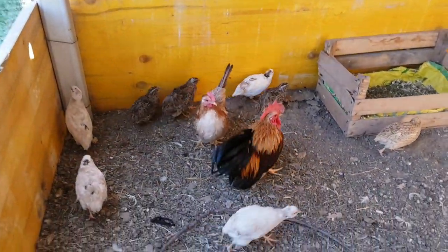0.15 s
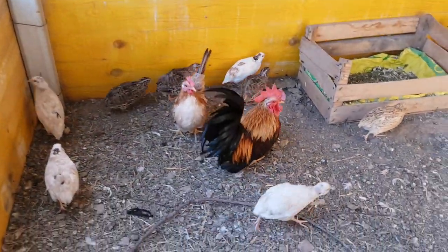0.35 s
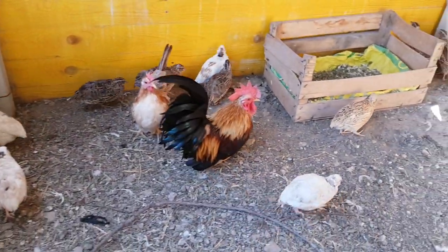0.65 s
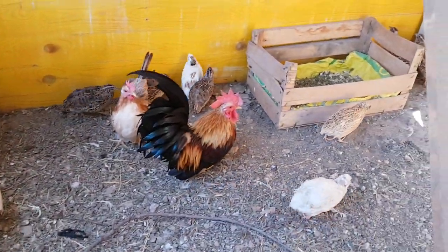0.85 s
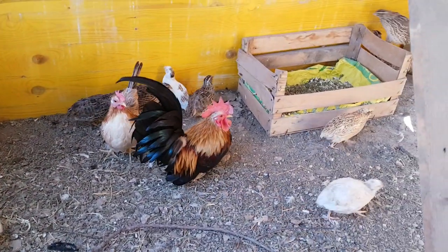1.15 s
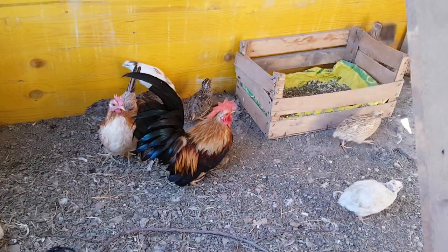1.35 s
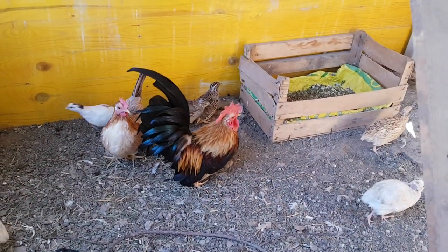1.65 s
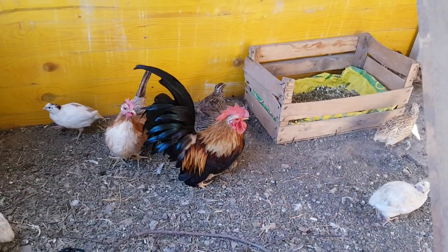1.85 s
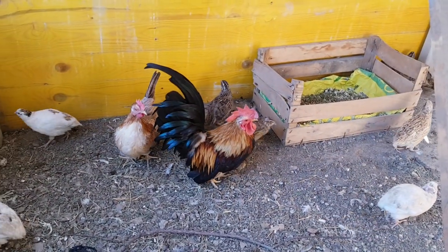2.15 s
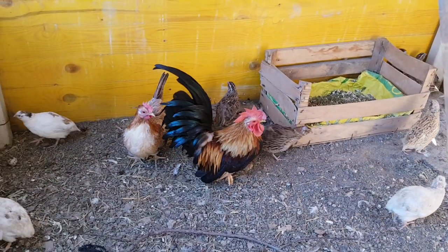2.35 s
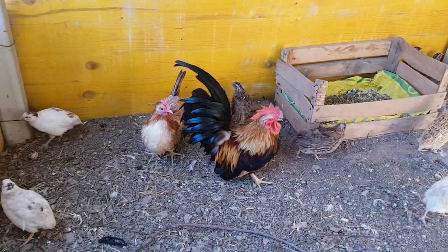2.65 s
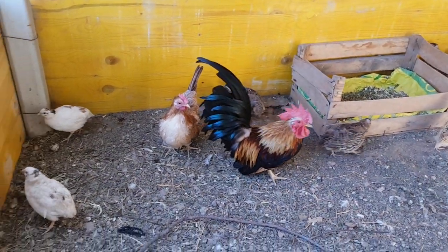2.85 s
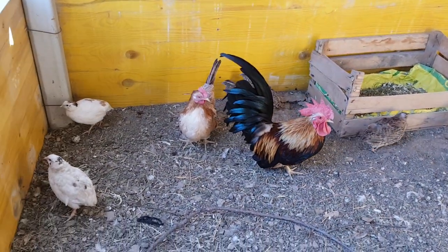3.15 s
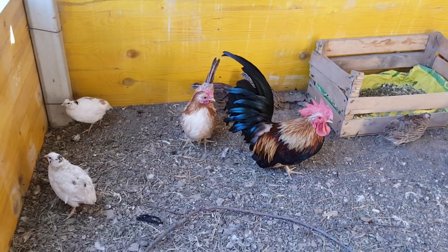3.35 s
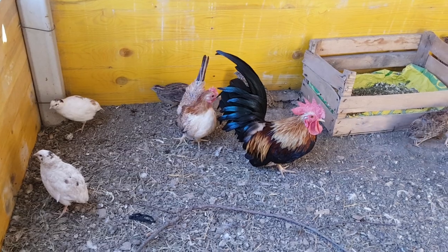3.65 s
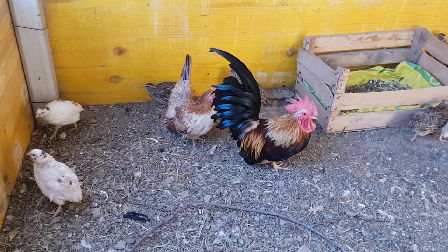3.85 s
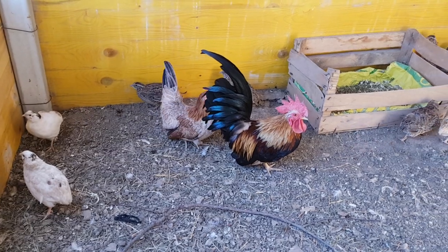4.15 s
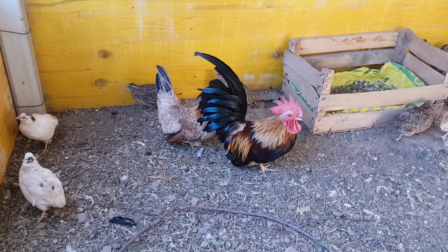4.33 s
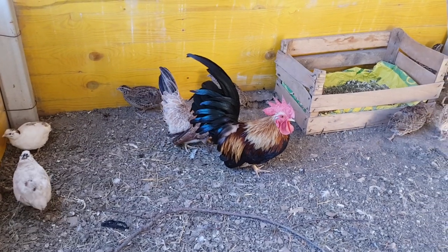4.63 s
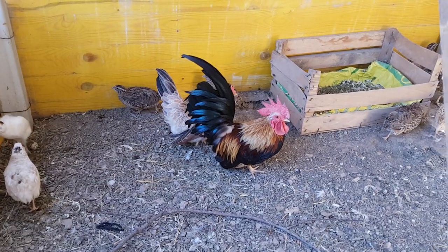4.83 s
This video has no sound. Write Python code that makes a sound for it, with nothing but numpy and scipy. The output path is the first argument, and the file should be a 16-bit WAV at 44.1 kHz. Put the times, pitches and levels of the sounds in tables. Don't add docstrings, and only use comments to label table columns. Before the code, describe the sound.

Quiet boarded bird pen: faint whistles and hum, a flurry of feet scraping grit and knocking wood, then a quail's loud rattling crow.

```python
import sys
import numpy as np
from scipy import signal
from scipy.fft import rfft, irfft, next_fast_len
from scipy.io import wavfile
from scipy.ndimage import uniform_filter1d

SR = 44100
rng = np.random.default_rng(int(sys.argv[2]) if len(sys.argv) > 2 else 0)


def transcribe(u):
    v = np.clip(np.atleast_2d(u).T, -1, 1)
    q = np.round(v * 32767).astype(np.int16)
    wavfile.write(sys.argv[1], SR, q)


def invert_db(x):
    u = np.asarray(x, float) / 20
    return 10 ** u


N = 219838

# frequency in Hz, level in dB per Hz.
GRIT_TONE = [(120, -34), (200, -3.5), (1080, 1), (1740, 3.5), (2420, -3), (7140, -14), (14900, -36.5),
             (16000, -84)]


def evened(x):
    return x / np.sqrt(np.mean(x ** 2) + 1e-20)


def read(points, hz):
    f, value = np.transpose(points)
    return np.interp(np.log(hz + 1), np.log(f + 1), value)


def add(mix, s, sound):
    part = mix[round(s * SR):][:len(sound)]
    part += sound[:len(part)]


def colour(x, gain):
    size = next_fast_len(x.shape[-1] + 512)
    spectrum = rfft(x, size) * gain(np.fft.rfftfreq(size, 1 / SR))
    return irfft(spectrum, size)[..., :x.shape[-1]]


def highpass(x, hz, order=4):
    return colour(x, lambda f: f ** order / (f ** order + float(hz) ** order))


def resonate(x, hz, width):
    turn = np.exp(2j * np.pi * np.cumsum(hz * np.ones(len(x))) / SR)
    r = np.exp(-np.pi * width / SR)
    return 2 * (turn * signal.lfilter([1 - r], [1, -r], x / turn + 1e-18)).real


def ports(x, lag_s, pan_db):
    late = colour(x, lambda f: invert_db(pan_db * f / (f + 400)) * np.exp(-2j * np.pi * f * lag_s))
    return np.array([late, x])


def air():
    # frequency in Hz, level in dB per Hz.
    air_tone = [(15, -47), (25, -14), (256, -14.5), (911, -13), (1740, -15), (6740, -23.5), (8830, -26.5),
                (16000, -31.5)]
    # frequency in Hz, left-right likeness from -1 to 1.
    likeness = [(60, 0.64), (150, 0.87), (380, 0.55), (950, -0.24), (2380, 0.14), (5980, -0.1),
                (15000, 0.029)]
    boom_hz, boom_octaves, boom_db = 422, 0.6, 7
    frames, hz = N // 256 + 5, np.fft.rfftfreq(1024, 1 / SR)
    a, b, c, d, patches = rng.standard_normal((frames, 513, 5)).T
    patches = evened(uniform_filter1d(uniform_filter1d(patches, 12, 0), 10, 1))
    swell = evened(uniform_filter1d(rng.standard_normal(frames), 20))
    same = np.clip(read(likeness, hz), -1, 1)[:, None]
    left = a + 1j * b
    right = same * left + np.sqrt(1 - same ** 2) * (c + 1j * d)
    boom = boom_db * np.exp(-(np.log2(hz / boom_hz + 1e-9) / boom_octaves) ** 4)
    level_db = (read(air_tone, hz) + boom)[:, None] + 1.6 * patches + .7 * swell
    z = np.array([left, right]) * invert_db(level_db)
    wash = evened(signal.istft(z, nperseg=1024, noverlap=768)[1][:, :N])
    return invert_db(-70) * wash * invert_db([[-1.2], [1.2]])


def hum():
    loud_span = (.25, 3.55)
    hum_hz, loud_db, faint_db, fade_s = 1156, -77.5, -90, .15
    t = np.arange(N) / SR
    inside = np.minimum(t - loud_span[0], loud_span[1] - t)
    on = np.clip(inside / fade_s + .5, 0, 1)
    whine = evened(resonate(resonate(rng.standard_normal(N), hum_hz, 38), hum_hz, 39))
    return ports(whine * invert_db(faint_db + (loud_db - faint_db) * on), .00036, -6)


def songbirds():
    # start in seconds, first pitch in Hz, last pitch in Hz, level in dB.
    chirps = [(0.03, 4300, 3560, -79), (0.057, 4300, 2220, -71), (0.2, 3320, 4320, -74.5),
              (0.222, 4330, 4800, -79), (0.266, 2240, 2270, -81.5), (0.322, 2470, 2840, -70),
              (0.348, 1970, 1800, -74), (0.361, 4830, 3620, -75), (0.422, 2500, 3640, -70.5),
              (0.463, 3490, 3140, -70), (0.49, 3600, 2050, -65), (0.526, 2050, 1950, -73),
              (0.762, 2820, 3920, -65.5), (0.786, 4200, 3100, -73), (0.819, 4020, 2240, -70),
              (.853, 1935, 1810, -76.5), (0.917, 3700, 4200, -75), (1.047, 5400, 2190, -67),
              (2.684, 2840, 2990, -74), (2.977, 3450, 2890, -71.5), (3.023, 2005, 1720, -82),
              (3.062, 5100, 2990, -77), (3.095, 2890, 1950, -81), (3.148, 4800, 2780, -76),
              (3.236, 2176, 1990, -78), (3.25, 3900, 2970, -75), (3.285, 2850, 2610, -71),
              (3.297, 2045, 2030, -77.5), (3.4, 2310, 2100, -80)]
    shortest_s, glide_s_per_octave = .026, .009
    out = np.zeros(N)
    for s, start_hz, end_hz, db in chirps:
        length = shortest_s + glide_s_per_octave * abs(np.log2(end_hz / start_hz))
        hz = np.geomspace(start_hz, end_hz, round(length * SR))
        wobble = evened(uniform_filter1d(rng.standard_normal(4000), size=90))
        flutter = invert_db(4.5 * wobble)[:len(hz)]
        whistle = np.sin(2 * np.pi * np.cumsum(hz) / SR)
        add(out, s, invert_db(db + 10) * flutter * whistle * np.hanning(len(hz)) ** .5)
    return out


def scrapes():
    # start in seconds, peak in dB, length in seconds, slope in dB per octave.
    strokes = [(0.771, -52, 0.03, 3), (1.237, -58.5, 0.014, 3), (1.252, -36.5, 0.036, 4.5),
               (1.279, -30, 0.035, 4.5), (1.307, -27.5, 0.018, 4.5), (1.366, -42.5, 0.038, 0.5),
               (1.416, -38.5, 0.013, 2), (1.434, -33, 0.013, 4), (1.4762, -38.5, 0.021, -1),
               (1.515, -47.5, 0.023, 0.5), (1.604, -46, 0.015, 4), (1.658, -46.5, 0.06, -2.5),
               (1.841, -40, 0.028, -3), (1.915, -40.5, 0.027, -1.5), (2.027, -55, 0.009, 3),
               (2.195, -60.5, 0.025, 11), (2.2984, -48, 0.052, 1.5), (2.313, -40, 0.015, 7.5),
               (2.385, -56.5, 0.019, 6.5), (2.9283, -53, 0.012, 7)]
    # start in seconds, peak in dB, slope in dB per octave.
    ticks = [(0.131, -48, -5.5), (0.3244, -46, -0.5), (0.69, -47, 9), (0.915, -36, 4.5), (1.0323, -46, 5),
             (1.1051, -46, 1.5), (1.183, -51.5, 5), (1.207, -47.5, 12), (1.6224, -33.5, 1),
             (2.1545, -53, -14), (3.249, -48, 15), (3.334, -50.5, -0.5), (3.504, -46, -4),
             (3.5659, -47, -2), (3.997, -53.5, 17), (4.031, -51, 4)]
    tick_s = 0.0037
    out, t = np.zeros(N), np.arange(0, .15, 1 / SR)
    for s, db, length, slope_db in strokes + [(s, db, tick_s, slope_db) for s, db, slope_db in ticks]:
        clicks = (rng.random(len(t)) < .03) * np.minimum(rng.exponential(1.2, len(t)), 3)
        grit = rng.standard_normal(len(t)) * (.4 + clicks)
        tilt_db = slope_db + 2
        grit = evened(colour(grit, lambda f: invert_db(read(GRIT_TONE, f) + tilt_db * np.log2(f / 4000 + 0.025))))
        shape = np.minimum(t / (.3 * length), 1) * np.exp(-(t / length) ** 1.8)
        add(out, s - .001, invert_db(db - 7) * grit * shape)
    return out


def knocks():
    # start in seconds, peak in dB, lowest mode in Hz, time to fall 60 dB in seconds.
    blows = [(1.04, -56, 460, 0.022), (1.101, -61.5, 367, 0.12), (1.309, -34, 579, 0.08),
             (1.394, -27.5, 743, 0.034), (1.452, -29.5, 382, 0.019), (1.467, -43, 400, 0.024),
             (1.6, -35, 442, 0.052), (1.613, -45, 185.4, 0.2), (1.606, -57, 47.5, 0.22),
             (1.39, -65.5, 47.2, 0.087), (2.027, -42.5, 483, 0.067), (2.512, -39.5, 485, 0.11),
             (3.502, -52, 1730, 0.02)]
    overtones = [1.004, 1.336, 1.824, 2.34, 2.39, 4.5, 3.9, 1.56, 3.3, 1.8, 5.5]
    hard_slope_db, slope_per_db, rise_cycles = -0.5, 0.17, 0.2
    out, t = np.zeros(N), np.arange(0, .5, 1 / SR)
    for s, db, hz, t60 in blows:
        slope_db = hard_slope_db + slope_per_db * (db + 18.5)
        spread = rng.uniform(0.907, 1.052, len(overtones))
        spread[0] = 1
        ring = np.zeros(len(t))
        for k, m in enumerate(overtones):
            fall_db = slope_db * 0.8 * k - 60 * t * m ** .5 / t60
            ring += invert_db(fall_db) * np.sin(2 * np.pi * hz * m * spread[k] * t)
        rattle = 0.018 * rng.standard_normal(2000) * np.exp(-t[:2000] / (0.26 * t60))
        ring = ring + signal.oaconvolve(ring, rattle)[:len(t)]
        ring = ring * (1 - np.exp(-t * hz / rise_cycles))
        ring = signal.lfilter(*signal.butter(3, .7 * hz, "high", fs=SR), ring)
        add(out, s, invert_db(db) * ring / abs(ring).max())
    return out


def treading():
    # time in seconds, effort in dB.
    effort = [(1.22, -74), (1.316, -54), (1.488, -53), (1.652, -59.5), (1.78, -59.5), (1.866, -49),
              (1.988, -48.5), (2.124, -61), (2.366, -73.5), (2.62, -66)]
    mesh_hz = 2400
    s, effort_db = np.transpose(effort)
    lumps_db = 3.2 * evened(uniform_filter1d(rng.standard_normal(N), 500))

    def noise(db):
        return rng.standard_normal(N) * invert_db(np.interp(np.arange(N) / SR, s, db, -120, -120) + lumps_db)

    tread = noise(effort_db)
    stir = noise(-58.5 + effort_db + 50.5)
    thud = noise(-60.5 + 0.35 * (effort_db + 32.5))
    dull = 2.05 * colour(tread, lambda f: invert_db(read(GRIT_TONE, f) - 3.8 * np.log2(f / 500 + 0.16)))
    wires = resonate(resonate(stir, mesh_hz, 260), mesh_hz, 500)
    mesh = 6.4 * wires + 1.12 * resonate(stir, 2740, 1180)
    rumble = 2.6 * resonate(resonate(thud, 104, 130), 83, 230) + 12.0 * resonate(thud, 180.5, 13)
    return dull + mesh + rumble


def thuds():
    # start in seconds, level in dB, centre in Hz, decay in seconds.
    landings = [(1.367, -47, 770, 0.0059), (1.914, -47.5, 1020, 0.013), (2.2, -57.5, 800, 0.0064),
                (2.31, -59, 1940, 0.014), (2.325, -50.5, 610, 0.028), (1.422, -51, 1760, 0.0099),
                (1.425, -46, 2820, 0.011), (2.392, -66, 690, 0.011), (2.509, -37, 890, 0.013),
                (2.511, -40.5, 1890, 0.0084), (2.675, -68, 473, 0.01), (2.787, -58, 1040, .032),
                (2.79, -58, 1710, 0.0093)]
    width_hz, rise_share = 550, 0.46
    out, t = np.zeros(N), np.arange(0, .2, 1 / SR)
    for s, db, hz, decay in landings:
        body = resonate(resonate(rng.standard_normal(len(t)), hz, width_hz), hz, 1.44 * width_hz)
        rise = rise_share * decay
        shape = np.minimum(t / rise, 1) * np.exp(-np.maximum(t - rise, 0) / decay)
        add(out, s, invert_db(db) * evened(body) * shape)
    return highpass(out, 280)


def mutter():
    # pitch in Hz, level in dB, third harmonic in dB.
    low_note = (204, -49, -55.5)
    pitch_hz, db, third_db = low_note
    start_s, length_s = 1.832, .055
    out = np.zeros(N)
    turn = 2 * np.pi * pitch_hz * np.arange(0, length_s, 1 / SR)
    tone = invert_db(db) * np.sin(turn) + invert_db(third_db) * np.sin(3 * turn)
    add(out, start_s, tone * np.hanning(len(turn)) ** .5)
    return out


def beak(t):
    # start in seconds, resting resonance in Hz, top resonance in Hz,
    # time open in seconds, lift while open in dB.
    note_flicks = [
        (4.15, 1190, 1190, .01, 0),
        (4.22, 1200, 1900, .021, -12),
        (4.255, 1200, 1000, .03, -3),
    ]
    # start in seconds, resting resonance in Hz.
    trill_flicks = [(4.411, 1100), (4.462, 1150), (4.513, 1200), (4.564, 1400), (4.615, 1700),
                    (4.665, 1700), (4.712, 1700), (4.757, 1700), (4.806, 2000), (4.846, 2750),
                    (4.885, 2950)]
    # resting resonance in Hz, level in dB.
    muffling = [(1200, -4), (1700, -1)]
    gape_hz, gape_db, gape_s = 3960, -5.5, .033
    tired_hz, tired_gape_s = 1850, .019
    snap_db, close_db = 6.5, 2.5
    trill = [(s, hz, gape_hz, gape_s if hz < tired_hz else tired_gape_s, gape_db) for s, hz in trill_flicks]
    s, rest_hz, top_hz, held, lift_db = np.transpose(note_flicks + trill)
    next_hz = np.append(rest_hz[1:], rest_hz[-1])
    at = s[:, None] + held[:, None] * [0, .12, .24, .62, .82, 1]
    opening_hz, closing_hz = (rest_hz + top_hz) / 2.2, (next_hz + top_hz) / 2.2
    hz = np.array([rest_hz, opening_hz, top_hz, .93 * top_hz, closing_hz, next_hz])
    wide = top_hz > tired_hz + 500
    shut_db, next_shut_db = wide * read(muffling, np.array([rest_hz, next_hz]))
    opening_db = np.where(wide, snap_db, lift_db / 2)
    closing_db = np.where(wide, close_db, lift_db / 2)
    db = np.array([shut_db, opening_db, lift_db, lift_db, closing_db, next_shut_db])
    return np.interp(t, at.ravel(), hz.T.ravel()), np.interp(t, at.ravel(), db.T.ravel())


def syrinx(effort_db, opened, lift_db):
    top_pitch_hz, pitch_hz_per_db, full_effort_db = 424, 1.25, -25
    n, over_db = len(effort_db), effort_db - full_effort_db
    rough = .08 + .26 * invert_db(.4 * over_db) + .25 * np.linspace(0, 1, n) ** 3
    rough = rough * (1 + 1.2 * opened) - .03 * np.minimum(lift_db, 0) * (1 - opened) ** 4
    rough = np.clip(rough, 0, 1)
    wander = evened(uniform_filter1d(rng.standard_normal(n), size=300))
    stutter = evened(uniform_filter1d(rng.standard_normal(n), size=160))
    pitch_hz = (top_pitch_hz + pitch_hz_per_db * over_db) * (1 + 0.0942 * rough * wander)
    turns = np.cumsum(pitch_hz) / SR
    pulses = sum(np.cos(2 * np.pi * k * turns) for k in range(1, 14))
    puffs = (0.89 + np.exp(-(turns % 1) / 0.3)) * rng.standard_normal(n)
    drive = (1 - rough) * evened(pulses) + rough * 1.6 * evened(puffs)
    drive = drive * (1 + 1.6 * np.minimum(rough, .45) * np.tanh(stutter))
    return drive, puffs, wander


def call(rows):
    # frequency in Hz, width in Hz, level in dB.
    windpipe = [(435, 930, -24), (1100, 500, 11), (1730, 270, 12), (2050, 170, 2), (2590, 126, 4.5),
                (3600, 190, -32), (3720, 180, 4.5), (4160, 190, 6.5)]
    # frequency in Hz, level in dB.
    rasp_tone = [(400, -51), (1000, -2.5), (3000, -1.5), (5000, -11.5), (7000, -20), (9000, -29.5),
                 (12500, -32.5), (16000, -49)]
    s, db = np.transpose(rows)
    t = np.arange(s[0], s[-1], 1 / SR)
    effort_db = np.interp(t, s, db)
    mouth_hz, lift_db = beak(t)
    opened = np.clip((mouth_hz - 1700) / 2200, 0, 1)
    drive, puffs, wander = syrinx(effort_db, opened, lift_db)

    shut = resonate(resonate(drive, mouth_hz, 320), mouth_hz, 560)
    agape = resonate(resonate(drive, mouth_hz, 800), mouth_hz, 1200)
    mouth = invert_db(lift_db) * ((1 - opened ** .5) * shut + .75 * opened ** .5 * agape)
    below = invert_db(-19) * opened * resonate(resonate(drive, .62 * mouth_hz, 1300), .62 * mouth_hz, 1800)
    throat = invert_db(-5.5 + 0.45 * (effort_db + 32)) * resonate(resonate(drive, 1150, 260), 1590, 267)
    source = mouth + below + throat
    pipe = invert_db(-13.0) * source + sum(invert_db(db) * resonate(source, f, w) for f, w, db in windpipe)

    strain = invert_db(.5 * (effort_db + 17.0))
    chest = resonate(resonate(drive, 367, 160), 784, 250)
    chest = chest + 1.36 * resonate(resonate(puffs, 1190, 530), 880, 660)
    chest = invert_db(-34.5) / np.maximum(strain, .2) ** 2.95 * chest
    leak = .45 + uniform_filter1d(opened, 100)
    rasp = colour(puffs, lambda f: invert_db(read(rasp_tone, f)))
    hiss = highpass(rasp, 6000, 6)
    spray = (.55 + .5 * opened) * invert_db(3 * wander) * hiss
    rasp = strain * (leak * (rasp - hiss) + spray)
    voice = evened(highpass(pipe + rasp + chest, 300))
    return s[0], invert_db(effort_db + 2.0) * voice * signal.windows.tukey(len(t), .06)


def quail():
    # time in seconds, effort in dB.
    calls = [
        [(4.165, -75.5), (4.174, -60), (4.195, -57.5), (4.2, -43), (4.258, -44), (4.267, -45.5), (4.295, -93)],
        [(4.375, -92), (4.397, -43), (4.455, -33), (4.587, -25), (4.843, -27), (4.853, -31.5), (4.871, -27.5),
         (4.93, -62)],
    ]
    out = np.zeros(N)
    for rows in calls:
        add(out, *call(rows))
    return out


def quail_at_ports(x):
    # frequency in Hz, left minus right in dB.
    tilt = [(60, 4), (150, 15), (380, -3), (950, 0), (2380, 0), (5980, -2.5), (15000, 4)]
    # frequency in Hz, phase by which left leads in radians.
    lead = [(0, 0), (1200, -2.1), (1640, -3.2), (2150, -5.4), (2930, -6.2), (5080, -13.7), (6720, -16.2),
            (16000, -38)]
    side = np.array([[1], [-1]]) / 2
    return colour(x, lambda f: invert_db(side * read(tilt, f)) * np.exp(1j * side * np.interp(f, *np.transpose(lead))))


def scatter(x):
    scatter_hz, scatter_s = 5000, .003
    top = highpass(x[0], scatter_hz)
    smear = rng.standard_normal(600) * np.exp(-np.arange(600) / (scatter_s * SR))
    smeared = signal.oaconvolve(top, smear / np.linalg.norm(smear))[:N]
    return np.array([x[0] - top + smeared, x[1]])


def pen(x):
    # frequency in Hz, time to fall 60 dB in seconds.
    echo_time = [(200, 0.093), (1000, 0.14), (2700, 0.24), (5000, 0.17), (12000, 0.075)]
    taps = np.zeros((2, SR // 2))
    at = np.arange(120, SR // 2 - 20, 20) + rng.integers(0, 20, (2, (SR // 2 - 121) // 20))
    np.put_along_axis(taps, at, rng.choice([-1., 1.], at.shape), 1)
    hz, t, z = signal.stft(taps, SR, nperseg=128)
    tail = signal.istft(z * invert_db(-60 * t / read(echo_time, hz)[:, None]), SR, nperseg=128)[1]
    return signal.fftconvolve(x[None], tail / np.linalg.norm(tail[0]), axes=1)[:, :N]


def scene():
    birds = songbirds() + mutter()
    feet = scrapes() + knocks() + treading() + thuds()
    male = quail()
    near = scatter(quail_at_ports(male) + ports(feet, .00028, -4.5))
    wet = invert_db(-10) * male + invert_db(-8.5) * feet + invert_db(-13.5) * birds
    echo = pen(colour(wet, lambda f: f / (f + 500)))
    return near + ports(birds, 0.00017, -10.0) + echo + air() + hum()


def top_cut(x):
    return signal.sosfilt(signal.butter(12, 16410, fs=SR, output="sos"), x)


def record(dry):
    # frequency in Hz, gain in dB.
    mic_tone = [(28, -24), (45, 12), (7500, 4), (9000, -1), (13000, 9.5), (15650, 8), (15850, -67)]
    mix = colour(dry, lambda f: invert_db(read(mic_tone, f))) - .0005
    return top_cut(mix)


dry = scene()
out = record(dry)
transcribe(out)
```